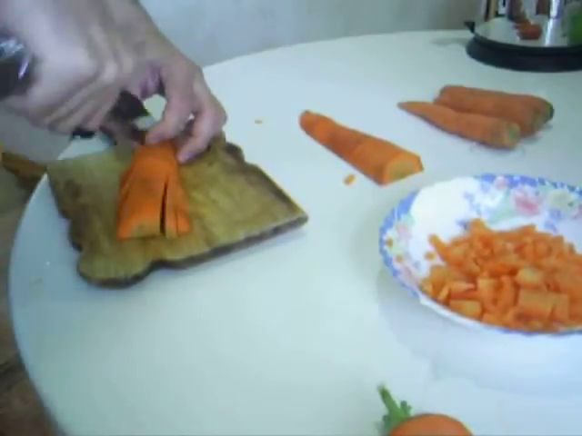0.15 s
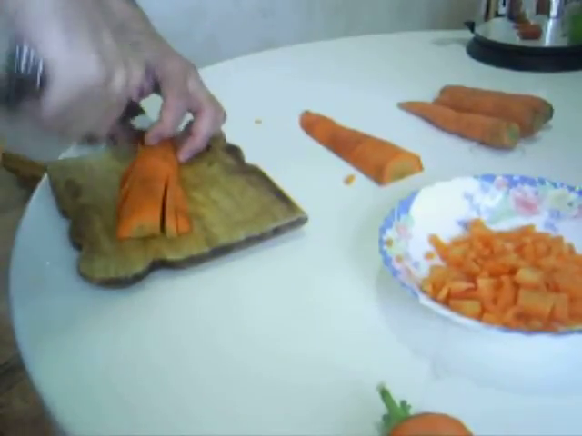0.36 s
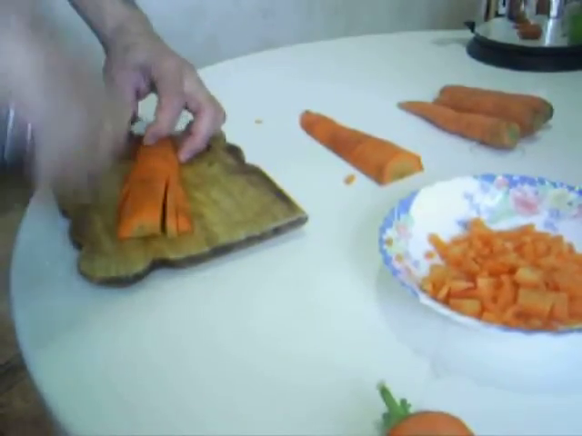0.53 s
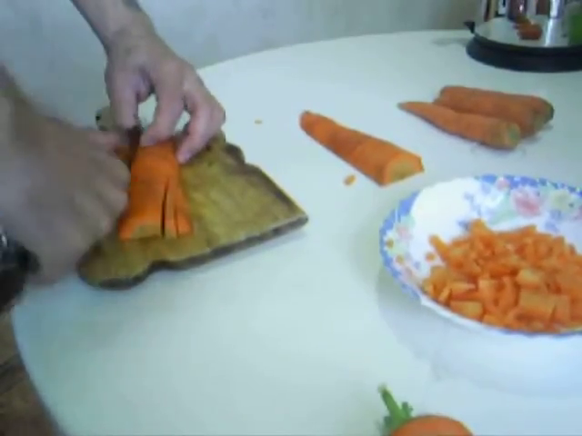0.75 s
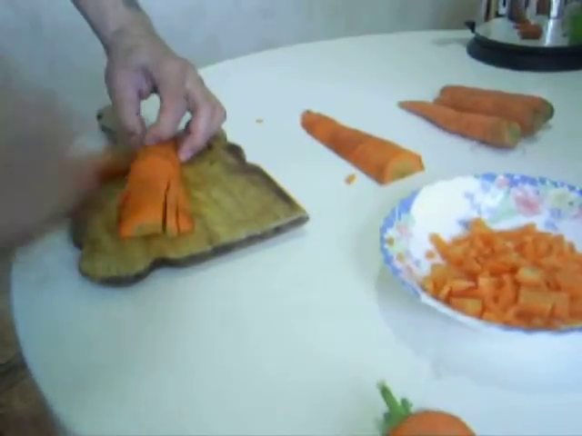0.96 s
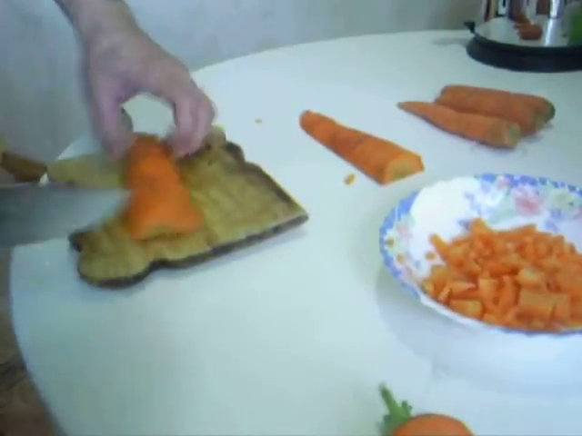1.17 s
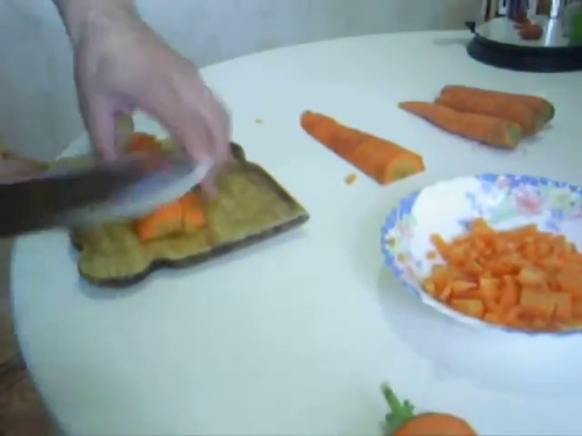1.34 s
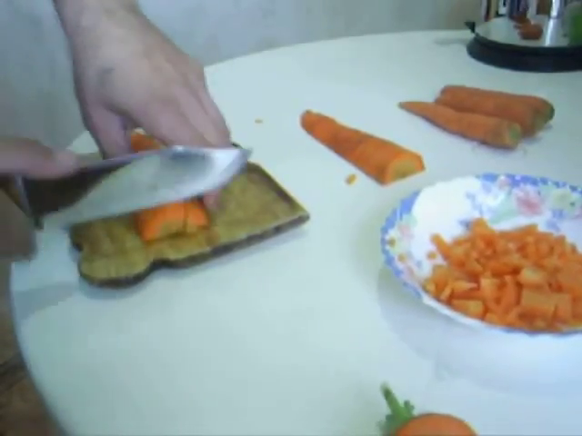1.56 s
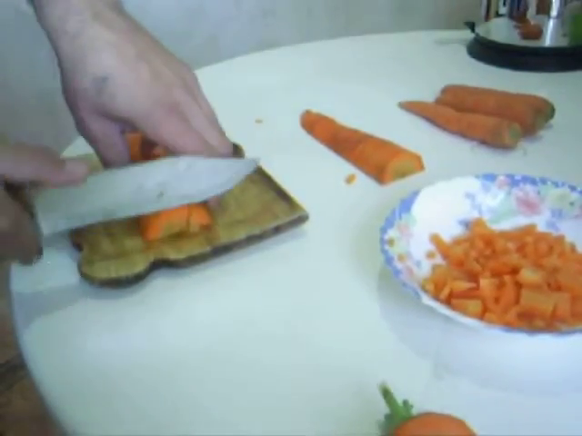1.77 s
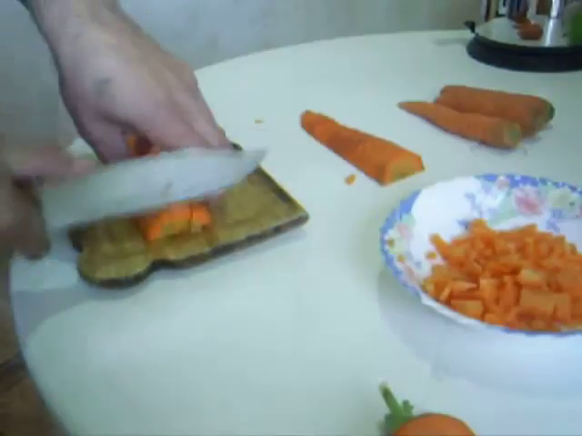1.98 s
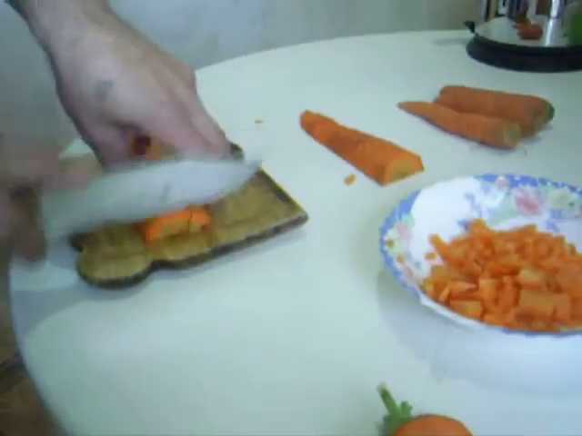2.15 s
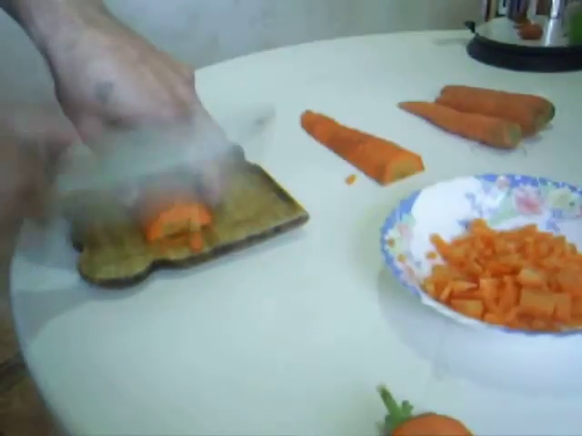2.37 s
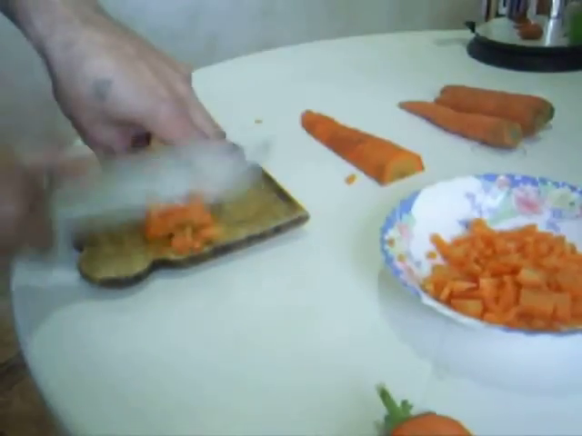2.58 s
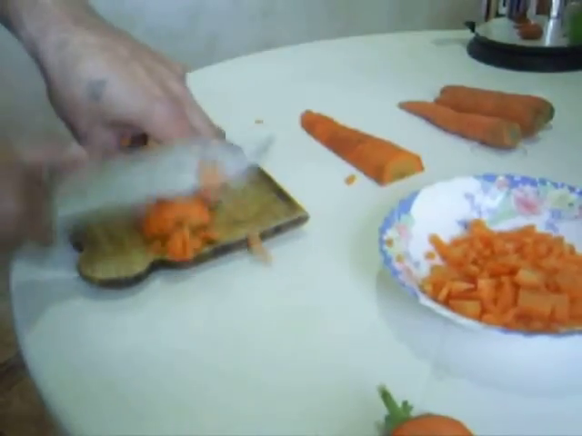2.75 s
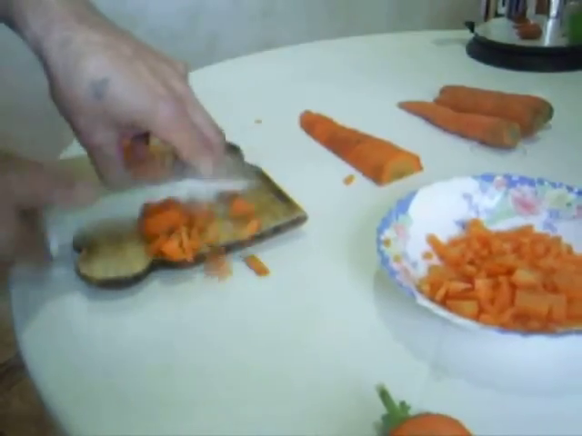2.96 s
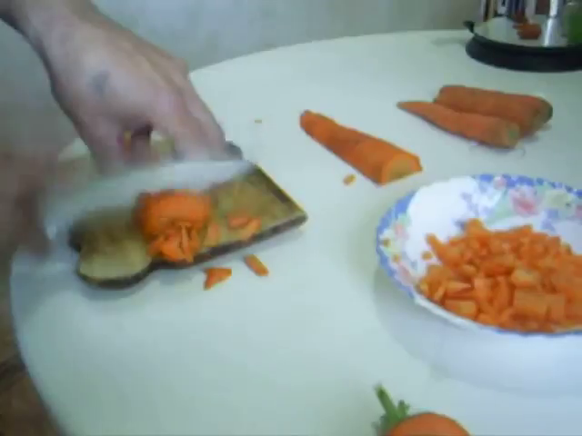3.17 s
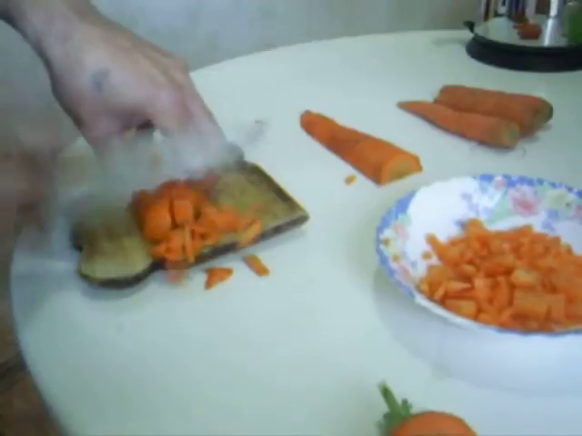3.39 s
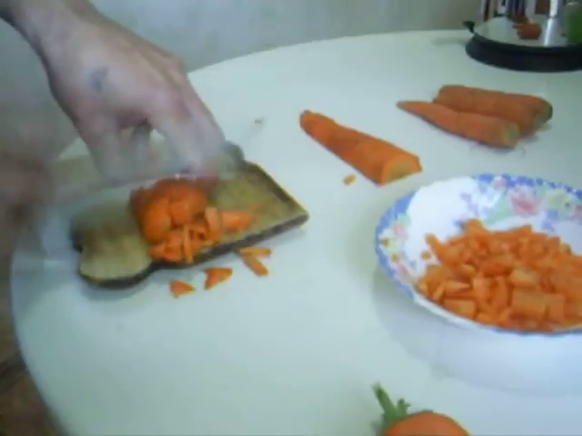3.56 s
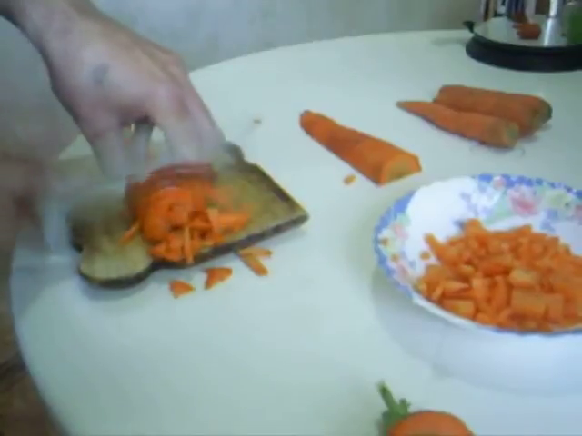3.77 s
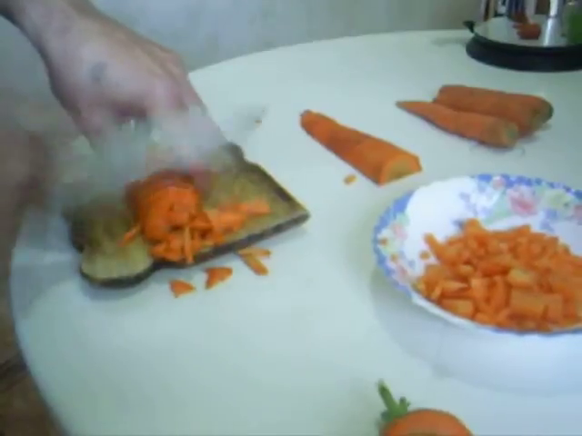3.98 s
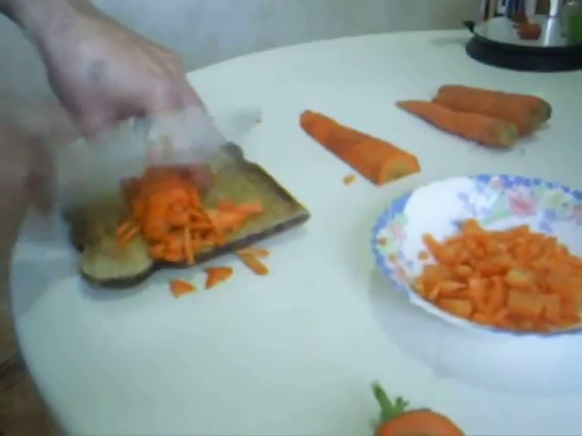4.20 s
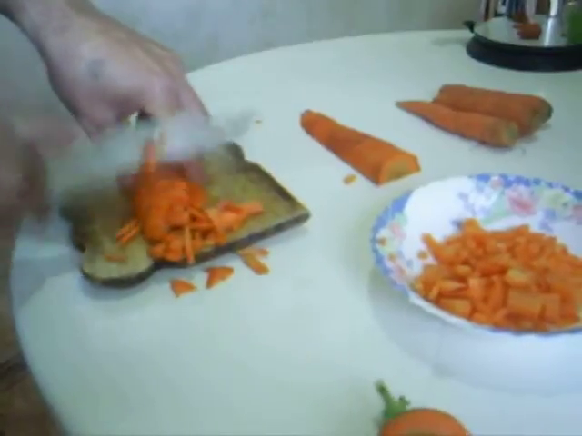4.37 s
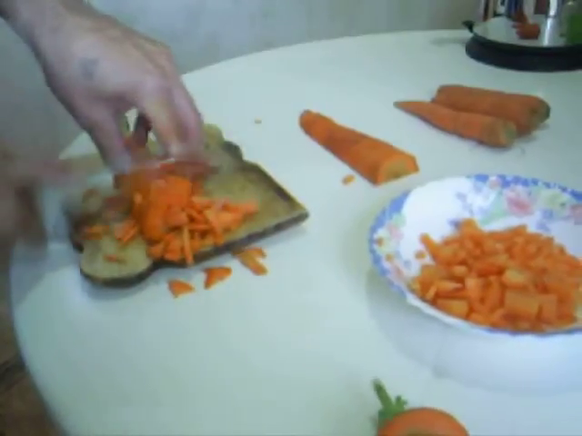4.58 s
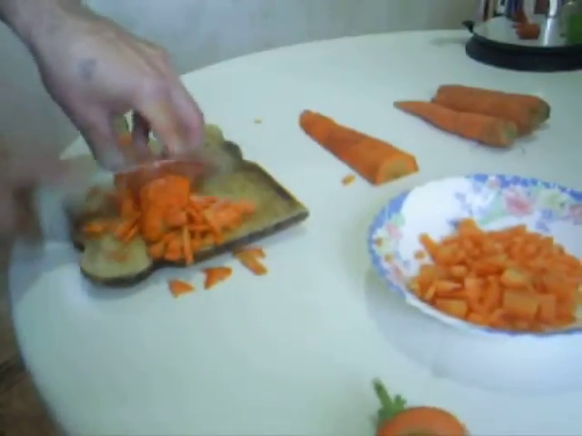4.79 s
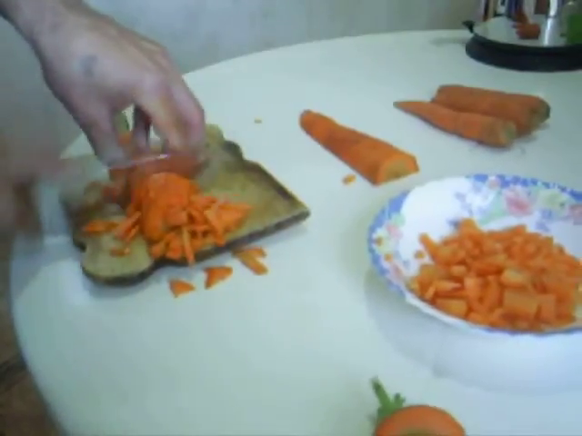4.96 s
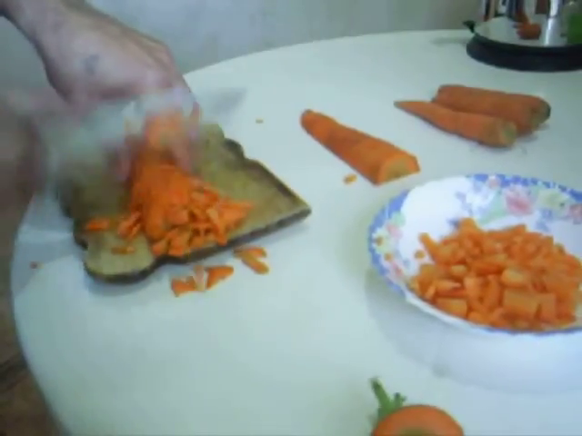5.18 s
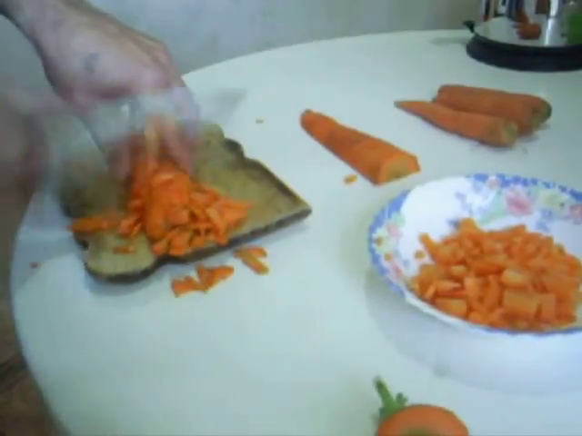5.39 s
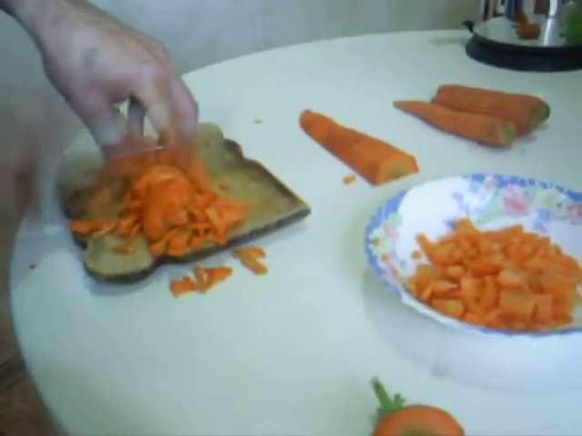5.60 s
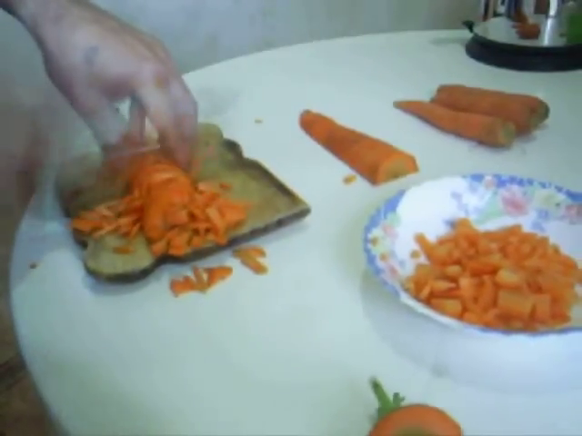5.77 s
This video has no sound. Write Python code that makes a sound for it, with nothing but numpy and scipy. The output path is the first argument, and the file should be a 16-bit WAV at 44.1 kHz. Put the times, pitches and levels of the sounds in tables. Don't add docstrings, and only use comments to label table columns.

```python
import sys
import numpy as np
from scipy import signal
from scipy.io import wavfile
from scipy.ndimage import uniform_filter1d

SR = 44100
rng = np.random.default_rng(int(sys.argv[2]) if len(sys.argv) > 2 else 0)


def generate_wav(sig):
    pcm = np.round(np.clip(np.atleast_2d(sig).T, -1, 1) * 32767).astype(np.int16)
    wavfile.write(sys.argv[1], SR, pcm)


def magnitude_from_level(level_db):
    exponent = np.asarray(level_db, float) / 20
    return 10 ** exponent


N = 257544


def evened(x):
    return x / np.sqrt(np.mean(x ** 2) + 1e-20)


def read(points, hz):
    point_hz, value = np.transpose(points)
    return np.interp(np.log(hz + 1), np.log(point_hz + 1), value)


def curve(rows):
    return np.interp(np.arange(N) / SR, *np.transpose(rows))


def add(mix, start_s, sound):
    part = mix[round(start_s * SR):][:len(sound)]
    part += sound[:len(part)]


# [start_s, level_db]
AIR_LEVEL = [(0, -37.5), (.2, -40), (.45, -34.5), (.7, -32), (1.4, -40), (1.65, -37), (2.5, -34.5),
             (5.84, -33.5)]
# [pitch_hz, density_db per Hz]
AIR_COLOUR = [(15, -60.5), (25, -9.5), (70, -10), (166, -17), (215, -15), (339, -16), (420, -11.5),
              (478, -19.5), (556, -16.5), (994, -24), (2980, -27.5), (3390, -25.5), (4300, -23.5),
              (5590, -47.5), (9460, -120)]


def air():
    frames, hz = N // 256 + 5, np.fft.rfftfreq(1024, 1 / SR)
    real, imaginary, patches = rng.standard_normal((frames, 513, 3)).T
    patches = uniform_filter1d(uniform_filter1d(patches, 8, 0), 10, 1)
    colour_db = read(AIR_COLOUR, hz)[:, None]
    spectrum = (real + 1j * imaginary) * magnitude_from_level(colour_db + 0.5 * evened(patches))
    noise = signal.istft(spectrum, nperseg=1024, noverlap=768)[1][:N]
    return magnitude_from_level(curve(AIR_LEVEL)) * evened(noise)


# [pitch_hz, t60_s]
ROOM_DECAY = [(100, 0.75), (300, 0.59), (800, 0.56), (2000, 0.69), (4000, 0.53)]


def room(x):
    echoes = np.zeros((3, SR))
    at = np.arange(160, SR - 20, 20) + rng.integers(0, 20, (3, (SR - 161) // 20))
    np.put_along_axis(echoes, at, rng.choice([-1., 1.], at.shape), 1)
    hz, t, spectrum = signal.stft(echoes, SR, nperseg=512)
    decay = magnitude_from_level(-60 * t / read(ROOM_DECAY, hz)[:, None])
    tails = signal.istft(spectrum * decay, SR, nperseg=512)[1]
    tails = tails / np.linalg.norm(tails[0])
    phase = 2.1 * np.arange(N) / SR + np.arange(3)[:, None] / 3
    turn = np.cos(np.pi * phase) * np.sqrt(2 / 3)
    return signal.fftconvolve(turn * x, tails, axes=1)[:, :N].sum(0)


def ring(modes, chance, spread_db, rise_hz):
    hz, db, t60_s = np.transpose(modes)[:, :, None]
    t = np.arange(int(SR * (t60_s.max() + .02))) / SR
    hz = hz * (1 + .012 * chance[::-1][:len(modes), None])
    sense = (-1.) ** np.arange(len(modes))[:, None]
    strength = sense * magnitude_from_level(db + spread_db * chance[:len(modes), None] - 60 * t / t60_s)
    out = (strength * np.sin(2 * np.pi * hz * t)).sum(0)
    out = out * (1 - np.exp(-t * rise_hz))
    return out / np.sqrt(np.mean(out[:SR // 50] ** 2))


# [level_db] for table, board, blade
ROOM_SHARE_DB = [0, 4, 2.5]
TRAVEL_S = .0016


def blows(rows, table, board, blade, push_hz, swings, crack_db, wet_db):
    push, cracks, parts = np.zeros(N), np.zeros(N), np.zeros((3, N))
    chance = rng.standard_normal((len(rows), 3, 8))
    crack = signal.unit_impulse(40) - 0.033 * np.exp(-np.arange(40) / 3.5)
    turns = np.arange(600) / SR * push_hz
    swing = np.sin(2 * np.pi * turns) * np.exp(-(turns / swings) ** 3)
    for (start_s, peak_db, table_db, board_db, blade_db), lots in zip(rows, chance):
        heard_s = start_s + TRAVEL_S
        add(push, heard_s, magnitude_from_level(peak_db - 1) * swing)
        add(cracks, heard_s, magnitude_from_level(blade_db + crack_db) * crack)
        levels_db = (table_db, board_db - 9.5, blade_db - 7.0)
        for part, db, modes, lot in zip(parts, levels_db, (table, board, blade), lots):
            add(part, heard_s, magnitude_from_level(db) * ring(modes, lot, 2.5, 4 * push_hz))
    direct = push + cracks + parts.sum(0)
    rings_to_room = magnitude_from_level(np.array(ROOM_SHARE_DB) + wet_db) @ parts
    return np.array([direct, rings_to_room, magnitude_from_level(wet_db + 4) * cracks])


# [pitch_hz, level_db, t60_s]
LOOSE_TABLE = [(75, -12, .12), (115, -8, .1), (139, 0, .22), (213, -10, .12), (290, -12, .08)]
PRESSED_BOARD = [(373, -4.5, 0.014), (414, -1.5, 0.038), (470, -6, 0.027), (570, 2, 0.024),
                 (743, -3.5, 0.015), (944, -5.5, 0.02)]
PRESSED_BLADE = [(1210, 5.5, 0.012), (1480, 11, 0.0032), (1773, 8, 0.0089), (2288, -1.5, 0.012),
                 (2980, -13.5, 0.029), (3654, 0, 0.0072)]
# [start_s, peak_db, table_db, board_db, blade_db]
TAPS = [
    (0.276, -44, -54.5, -34.5, -52),
    (1.072, -22, -36, -26, -23),
    (1.453, -31, -40, -28, -32),
    (1.673, -28, -33.5, -26.5, -30),
    (1.797, -39, -38.5, -50, -33),
    (1.908, -35, -39.5, -31, -30),
    (2.121, -28.5, -27, -35, -27.5),
    (2.134, -24, -34, -20, -46.5),
    (2.277, -31, -28.5, -30, -33.5),
    (2.309, -31, -49.5, -29, -49.5),
]


def light_taps():
    return blows(TAPS, LOOSE_TABLE, PRESSED_BOARD, PRESSED_BLADE,
                 push_hz=895, swings=1.6, crack_db=20.5, wet_db=-2.0)


# [pitch_hz, level_db, t60_s]
PRESSED_TABLE = [(75.4, -3, 0.14), (122, -2, 0.08), (137.8, -1, 0.31), (208.7, 1, 0.23), (249, -4.5, 0.061),
                 (302, 1, 0.1)]
# [start_s, peak_db, table_db, board_db, blade_db]
CUTS = [
    (0.6738, 1, -16, -9.5, -19),
    (0.9222, -5.5, -23.5, -13, -19),
    (0.9275, -10.5, -9, -7, -22),
    (1.085, -20, -36, -17, -30.5),
    (1.2132, -5.5, -15, -6.5, -17),
    (1.284, -24, -27.5, -33, -25),
    (3.462, -42, -25, -21.5, -32.5),
    (2.4982, -7, -17.5, -10, -24),
]


def lengthwise_cuts():
    return blows(CUTS, PRESSED_TABLE, PRESSED_BOARD, PRESSED_BLADE,
                 push_hz=575, swings=1.6, crack_db=23.5, wet_db=-3.5)


def resonate(x, hz, width_hz):
    r = np.exp(-np.pi * width_hz / SR)
    return 2 * signal.lfilter([1 - r], [1, -r * np.exp(2j * np.pi * hz / SR)], x).real


# [pitch_hz, width_hz, level_db]
SCRAPE_MODES = [(420, 160, -40.5), (740, 170, -1.5), (1250, 210, -7), (1470, 29, -3.5), (1970, 250, -28.5),
                (3500, 700, -11)]
# [start_s, level_db]
STROKES = [
    (1.73, -45),
    (1.8, -30),
    (1.92, -46.5),
    (1.989, -28.5),
    (2.09, -38),
    (2.15, -36),
    (2.26, -42.5),
]
DRAG_FROM_S, DRAG_TO_S, LAND_S, DRAG_DB, STROKE_S = 1.5, 2.48, .04, -39, 0.04


def scrape():
    slip_size = magnitude_from_level(5.7 * np.minimum(rng.exponential(1, N), 4))
    slips = slip_size * (rng.random(N) < 900 / SR) * rng.choice([-1., 1.], N)
    body = sum(magnitude_from_level(db) * evened(resonate(slips, hz, width_hz)) for hz, width_hz, db in SCRAPE_MODES)
    t = np.arange(N) / SR
    drag = magnitude_from_level(DRAG_DB) * np.clip((t - DRAG_FROM_S) / LAND_S, 0, 1) * (t < DRAG_TO_S)
    press = sum(magnitude_from_level(db) * np.exp(-abs(t - start_s) / STROKE_S) for start_s, db in STROKES)
    return magnitude_from_level(-13) * (drag + press) * body


# [pitch_hz, level_db, t60_s]
TABLE = [(70, -9, .2), (115, -7, .15), (142, -1, .25), (213, 0, .33), (243, 1, .35), (286, -11, .18)]
BOARD = [(396, -1.5, 0.033), (471.3, -2.5, 0.02), (473, -0.5, 0.011), (593.3, -1, 0.064), (673, 2, 0.029),
         (805, 19, 0.0033), (1040, -9, 0.03)]
BLADE_ON_THICK = [(1400, -4, 0.0086), (1536, 0.5, 0.0062), (1782, -7.5, 0.013), (1896, -8.5, 0.0095),
                  (2276, -16, 0.013), (2450, -21.5, 0.0055), (3400, -21, 0.011), (3720, -9.5, 0.0027)]
# [start_s, peak_db, table_db, board_db, blade_db]
SLAM = [
    (2.5192, 12, -11, -4, -37),
    (2.5222, 3, -26.5, -6, -7.5),
    (2.5258, 4.8, -25.5, -18, -16.5),
]


def slam():
    return blows(SLAM, TABLE, BOARD, BLADE_ON_THICK, push_hz=560, swings=1.3, crack_db=29, wet_db=-2.5)


BLOW_DB, BLOW_PER_FORCE = 2.5, .4


def chops(rows, average_db):
    table_db, board_db, blade_db = average_db
    return [(start_s, BLOW_DB + BLOW_PER_FORCE * force_db, table_db + wood_db, board_db + wood_db,
             blade_db + force_db) for start_s, force_db, wood_db, _ in rows]


# [level_db] for table, board, blade
THICK_DB = (-20, -8.5, -10.5)
# [start_s, blade_force_db, wood_hit_db, microphone_recovery_s]
FIRST_CHOPS = [
    (2.698, -2, 1, .12),
    (2.864, 0, -0.5, 0.051),
    (3.016, -2, -1.5, 0.028),
    (3.158, -0.5, 1.5, 0.034),
    (3.498, -0.5, -1, .085),
    (3.635, -2, 3, .07),
]


def first_chops():
    return blows(chops(FIRST_CHOPS, THICK_DB), TABLE, BOARD, BLADE_ON_THICK,
                 push_hz=602, swings=1.12, crack_db=29.5, wet_db=0.8)


# [pitch_hz, level_db, t60_s]
BLADE = [(1165, 16, 0.025), (1528, 16, 0.017), (1640, -36, 0.011), (1749, 33, 0.0098), (2078, 15.5, 0.0086),
         (2270, -17, 0.042), (2570, 3.5, 0.0053), (3080, -8, 0.018)]
# [level_db] for table, board, blade
THIN_DB = (-21, -11, -9)
# [start_s, blade_force_db, wood_hit_db, microphone_recovery_s]
CHOPS = [(3.795, 0.32, 2, .16), (3.972, -0.3, -2, 0.13), (4.111, -0.21, 3, .1), (4.279, -0.07, 2, 0.053),
         (4.444, -0.59, -1.5, .15), (4.593, 0.08, -0.5, 0.01), (4.758, -0.37, 0.5, 0.079),
         (4.9153, -0.58, -1.5, .06), (5.09, -2.2, -3.5, 0.028), (5.243, -1.5, -2, 0.11),
         (5.402, -0.5, -2.5, 0.076), (5.563, -0.63, -2.5, .065), (5.732, -2.1, -0.5, .12)]


def later_chops():
    return blows(chops(CHOPS, THIN_DB), TABLE, BOARD, BLADE,
                 push_hz=721, swings=1.15, crack_db=24.5, wet_db=2.12)


def scene():
    direct, rings, cracks = light_taps() + lengthwise_cuts() + slam() + first_chops() + later_chops()
    rub = scrape()
    return (direct + rub + room(rings + 1.72 * rub) + room(cracks) + air())[None]


# [start_s, microphone_recovery_s]
HEAVY = [
    (.678, .11),
    (1.215, 0.057),
    (2.52, .045),
]
SAG_DEPTH, SAG_PER_RMS = .053, .3


def sag(x):
    t = np.arange(N) / SR
    upsets = HEAVY + [(row[0], row[-1]) for row in FIRST_CHOPS + CHOPS]
    upset = sum((t > s + .004) * (t < s + .004 + hold_s) for s, hold_s in upsets) > 0
    loudness = np.sqrt(abs(uniform_filter1d(x ** 2, size=4000)))
    lean = np.minimum(SAG_PER_RMS * loudness, .4 * SAG_DEPTH)
    depth = np.where(upset, SAG_DEPTH, lean * (t > SLAM[0][0]))
    return -uniform_filter1d(depth, size=130)


def roll_off(x):
    return signal.sosfilt(signal.butter(12, 17130, fs=SR, output="sos"), x)


EDGE_HZ, CLIP = 3863, .7
DULL, TOP_HZ = .08, 16300


def record(dry):
    dry = signal.sosfilt(signal.butter(2, 55, "high", fs=SR, output="sos"), dry)
    power_db = 10 * np.log10(signal.lfilter([.01], [1, -.99], dry[0] ** 2) + 1e-12)
    fall = np.arange(N) * 4.6 / SR
    held_db = np.maximum.accumulate(power_db + fall) - fall
    over_db = np.maximum(held_db + 21.5, 0)
    ducked = dry / magnitude_from_level(0.13 * signal.lfilter([.012], [1, -.988], over_db))
    band = signal.firwin(131, EDGE_HZ, window=("kaiser", 8.5), fs=SR)
    narrow = signal.oaconvolve(ducked, band[None], "same")
    clipped = np.clip(narrow + sag(narrow[0]), -CLIP, CLIP)
    top = np.convolve([DULL, 1 - 2 * DULL, DULL], signal.firwin(63, TOP_HZ, fs=SR))
    return roll_off(signal.oaconvolve(clipped, top[None], "same"))


dry = scene()
out = record(dry)
generate_wav(out)
```